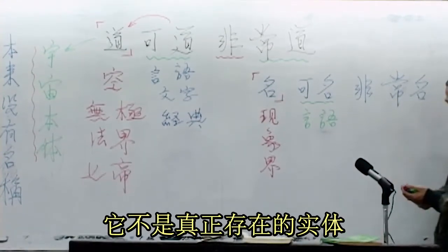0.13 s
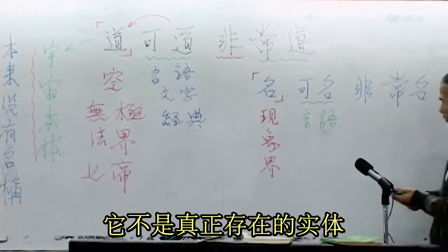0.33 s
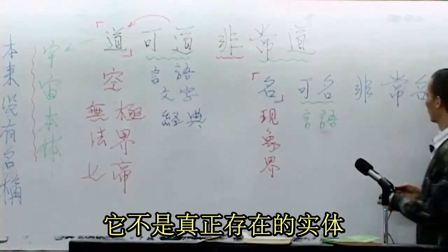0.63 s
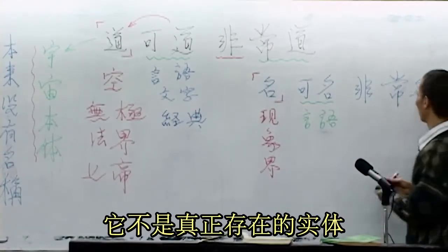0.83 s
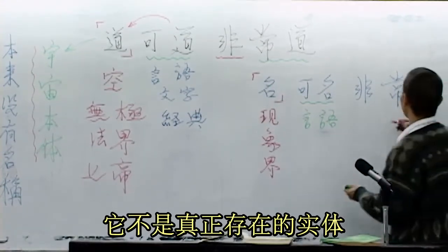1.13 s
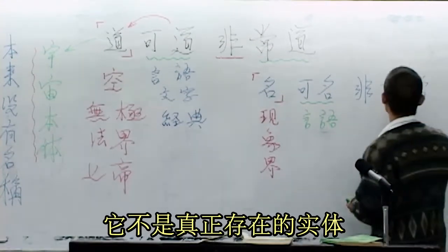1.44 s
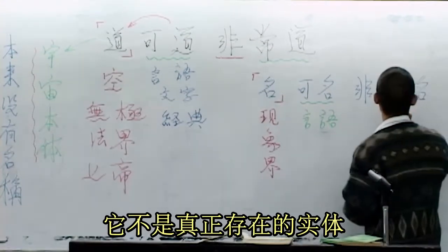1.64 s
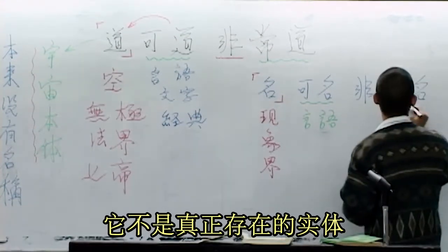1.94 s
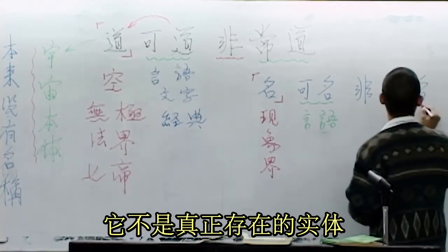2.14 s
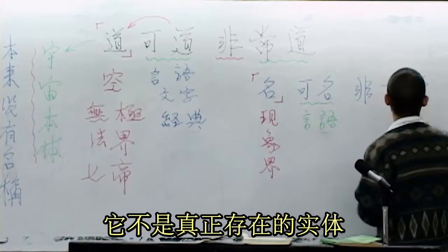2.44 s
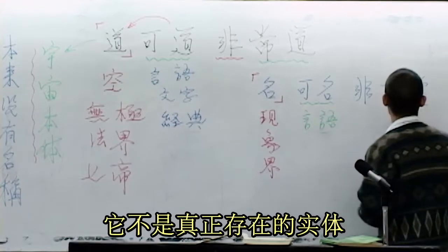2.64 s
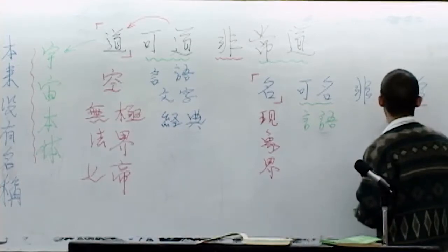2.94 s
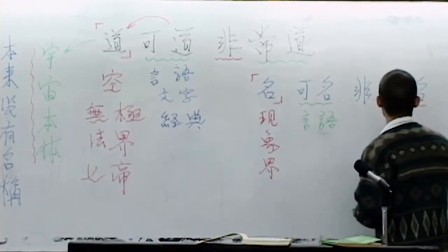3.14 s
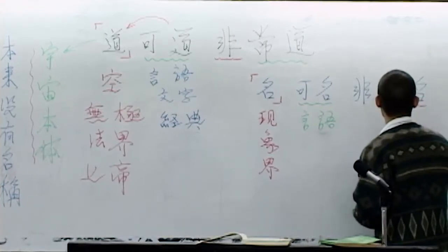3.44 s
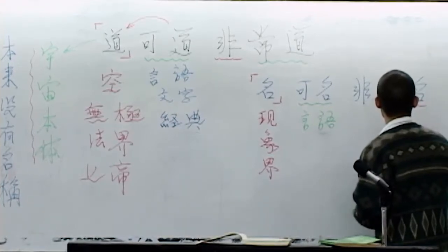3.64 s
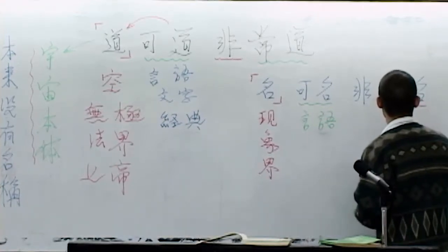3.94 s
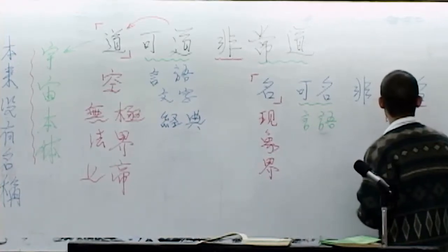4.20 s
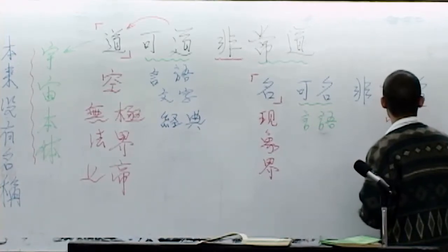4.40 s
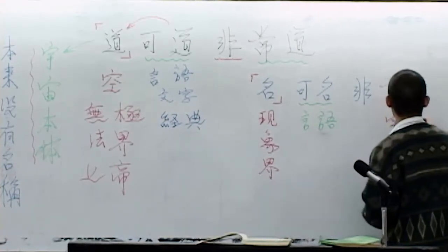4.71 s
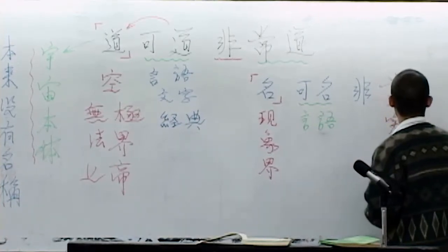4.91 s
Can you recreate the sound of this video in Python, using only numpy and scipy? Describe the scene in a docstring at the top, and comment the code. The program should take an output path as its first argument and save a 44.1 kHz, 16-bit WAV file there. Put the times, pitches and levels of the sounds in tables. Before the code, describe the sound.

Small plastic clicks and a cap snap, followed by faint squeaky marker strokes and soft thuds on a whiteboard over low room rumble.

```python
"""A felt-tip marker on a classroom whiteboard, close to the microphone. The teacher clicks the plastic cap,
snaps it off and steps up; something hollow is knocked. The tip rubs in fine grains, sticks and slips
in squeaks, and lands with dull thuds of the panel. The room rings faintly behind it, over a low rumble,
bumps through the floor and a thin high whine. The recorder's noise suppressor trims the tails."""
import sys
import numpy as np
from scipy import signal
from scipy.fft import rfft, irfft, next_fast_len
from scipy.io import wavfile
from scipy.ndimage import uniform_filter1d, map_coordinates

SR = 44100
rng = np.random.default_rng(int(sys.argv[2]) if len(sys.argv) > 2 else 0)


def wav_record(signal):
    """Record a signal, one row per channel, as 16-bit PCM in the file named by sys.argv[1]."""
    frames = np.transpose(np.atleast_2d(signal))
    bounded = np.clip(frames, -1, 1)
    # unit amplitude maps onto the largest positive 16-bit level
    quanta = np.round(bounded * 32767).astype(np.int16)
    wavfile.write(sys.argv[1], SR, quanta)


N = 223317
TIME = np.arange(N) / SR

# spectrum of the noise behind the room's rumble: f/Hz, level/dB
RUMBLE_SPECTRUM = [(20, -24.5), (35, -7.5), (50, 4.5), (72, -5), (100, -8.5), (135, -22), (200, -44.5),
                   (400, -73.5)]
# the thin whine, loudest at the start: t/s, level/dB
WHINE_LEVELS = [(0, -75.5), (1.1, -79.5), (1.85, -89), (2.85, -89.5), (3.1, -106), (5.06, -95.5)]
# the pen clicking in the hand: t/s, level/dB, contact time/s, treble tilt/(dB per octave)
PEN_CLICKS = [(.0074, -36, 0.0001, 4), (.0575, -59, 0.00028, -0.5), (.0821, -40.5, 0.00023, -0.5),
              (.0985, -62, 0.00037, -2), (.1145, -48, .003, 1), (.1187, -41, 0.0016, -3),
              (.3193, -33.5, 0.00075, -13.5), (.3612, -46.5, 0.00064, -14.5), (.3795, -68, 0.00039, -4.5)]
# the ring of the pen's barrel: f/Hz, level/dB
BARREL_SPECTRUM = [(1900, -74), (2450, -47.5), (2750, -25.5), (3100, -43.5), (3550, -21), (3950, -42.5),
                   (4280, -28), (4480, -36), (4800, -18.5), (5400, -9), (6200, -21.5), (6850, -17),
                   (7700, -30.5), (9300, -40.5), (10000, -32.5), (11500, -47), (12700, -36.5),
                   (14500, -61.5)]
# small parts that ping at one tone: t/s, f/Hz, level/dB, t60/s
PART_PINGS = [(.118, 1108, -72, 0.076), (3.537, 590, -55.5, 0.014), (3.539, 2860, -46, 0.024),
              (3.54, 8130, -49.5, 0.016), (4.744, 1280, -78.5, 0.089)]
# bumps through the floor as the teacher shifts: t/s, length/s, level/dB
FLOOR_BUMPS = [(0.238, 0.034, -52.5), (0.403, 0.22, -61.5), (.68, 0.17, -54), (0.846, 0.16, -58),
               (1.052, .11, -53.5), (1.302, 0.18, -58), (1.439, .12, -55.5), (1.598, 0.18, -56),
               (1.724, .17, -51.5), (2.139, 0.063, -52), (2.233, 0.037, -54), (2.398, 0.064, -53.5),
               (2.512, 0.12, -55), (2.758, 0.18, -44.5), (2.92, 0.19, -48), (3.628, 0.16, -50.5),
               (3.908, 0.2, -63), (4.141, .12, -56), (4.512, 0.065, -57.5), (4.676, 0.24, -55.5),
               (4.852, 0.34, -46.5)]
# the cap riding over its ridge: t/s, level/dB, contact time/s, treble tilt/(dB per octave)
CAP_SNAPS = [(.9850, -55, 0.0026, 2.5), (.9890, -55.5, .0008, 2), (.9908, -33.5, 0.00049, -0.5),
             (.9946, -37, 0.00027, 1), (1.0064, -44, 0.00069, 1)]
# the ring of the cap: f/Hz, level/dB
CAP_SPECTRUM = [(690, -56), (830, -19.5), (1200, -49), (1500, -27.5), (1680, -8.5), (1880, -21.5),
                (2130, -9), (2450, -27), (3400, -5.5), (4150, -14.5), (4750, -2), (5900, -17.5),
                (7900, -7.5), (9300, -32), (10400, -14), (12400, -57)]
# one step up to the board: t/s, level/dB, tilt/(dB per octave)
FOOTSTEPS = [(1.161, -30, 1.5)]
# the floor's low modes: f/Hz, level/dB, swell time/s
FLOOR_MODES = [(49.7, -22, 0.038), (87.6, 0.5, 0.018), (124, -5.5, 0.017), (163, -6.5, 0.012),
               (212, -24, 0.026)]
# the contacts of one chattering knock: t/s, level/dB
KNOCK_CONTACTS = [(1.745, -53.5), (1.755, -44), (1.768, -53.5), (1.782, -52)]
# the hollow body's modes: f/Hz, level/dB, t60/s
HOLLOW_MODES = [(146, 2, 0.18), (244.2, 6, 0.23), (365.6, 0, 0.16), (611, -14.5, 0.35), (688, -9.5, 0.12),
                (863, -9, 0.083), (987.5, -1.5, 0.1), (1456, -17.5, 0.059), (1857, -23, 0.077),
                (3040, -30, 0.079)]
# strokes of the felt tip, whose angle sets two resonances:
# t/s, length/s, nib level/dB, rasp level/dB, swell over the stroke/dB, nib f/Hz, rasp f/Hz
TIP_STROKES = [(1.908, 0.053, -100, -77, 4.5, 4560, 6530), (1.958, 0.25, -91, -68.5, -9, 4550, 6610),
               (2.129, 0.09, -74, -65.5, -0.5, 4590, 6690), (2.237, 0.089, -74, -64.5, 14.5, 4750, 6705),
               (2.358, 0.18, -87.5, -84, -10.5, 4765, 6600), (2.839, 0.046, -87.5, -108, 2.5, 5230, 6020),
               (3.009, 0.084, -75, -86, -6, 5105, 5840), (3.116, 0.061, -84.5, -108, 5.5, 5180, 5700),
               (3.177, 0.062, -70, -86, 8.5, 5320, 6130), (3.237, 0.087, -78.5, -71.5, -2, 5440, 6100),
               (3.321, 0.13, -71.5, -84, -23.5, 5040, 6000), (3.518, 0.031, -63, -67.5, 1.5, 4860, 6720),
               (3.594, 0.039, -62.5, -80.5, 7, 4950, 6830), (3.675, 0.045, -63, -79.5, 3, 5270, 6800),
               (3.743, 0.038, -65.5, -85.5, -7, 5100, 6340), (3.786, 0.023, -57, -74, 3, 5040, 7210),
               (3.849, 0.071, -62, -72.5, 0, 5276, 6910), (3.95, 0.25, -84.5, -98.5, -6.5, 5270, 6670),
               (4.114, 0.093, -59.5, -66, 9.5, 5020, 6950), (4.235, .13, -77, -78.5, -5.5, 4870, 6860),
               (4.364, 0.094, -76.5, -75, 3, 4780, 6390), (4.475, 0.064, -85, -86.5, -7, 4600, 6670),
               (4.571, 0.024, -70, -84, -1, 4805, 6800), (4.938, 0.15, -72.5, -80, -14.5, 5090, 6700)]
# narrow resonances of the pen that colour every stroke: f/Hz, half-width/Hz, boost/dB
PEN_RESONANCES = [(4590, 41, 7.5), (5240, 70, 6), (6480, 60, 3.5), (6823, 59, 6.5)]
# gliding squeaks of the tip: t/s, length/s, level/dB, first f/Hz, last f/Hz
TIP_SQUEAKS = [(2.116, 0.087, -75.5, 4670, 4670), (2.316, 0.033, -58.5, 4840, 4705),
               (3.333, 0.033, -58.5, 4763, 4620), (3.5396, 0.0065, -32, 4290, 5940),
               (3.641, .01, -62.5, 4790, 4410), (3.6503, 0.0046, -48.5, 5530, 5260),
               (4.171, .007, -49, 4740, 4780), (4.186, .009, -43.5, 4710, 4680),
               (4.2, 0.0096, -48, 4770, 4570), (4.2057, .02, -36.5, 4670, 4470),
               (4.99, 0.042, -62.5, 4837, 4774)]
# the tip landing on the panel: t/s, level/dB, tilt/(dB per octave)
TIP_LANDINGS = [(2.790, -35.5, 1.5), (3.003, -35.5, 0.5), (3.526, -40, 2), (4.058, -44.5, -6),
                (4.34, -47.5, -2.5), (4.902, -49.5, -5.5)]
# the panel's low modes: f/Hz, level/dB, swell time/s
PANEL_MODES = [(47.7, -13, 0.031), (77.8, -0.5, 0.019), (154, -3.5, 0.012), (200, -7, 0.016),
               (242, 1, 0.011), (303, -13, 0.009)]
# the classroom's reverberation: f/Hz, t60/s
ROOM_DECAY = [(80, 0.99), (250, 1), (1000, 0.11), (2200, 0.83), (3500, 1), (5400, 0.94), (7500, 1),
              (11000, 0.91), (14000, .45)]
# the suppressor shuts bands that fall below this: f/Hz, power density/dB
SUPPRESSOR_THRESHOLD = [(30, -91), (80, -87.5), (250, -92.5), (500, -108), (1500, -116), (3000, -117),
                        (5500, -118), (8500, -118), (12000, -124)]
# the recorder's own hiss: f/Hz, relative level/dB
HISS_SPECTRUM = [(30, -3), (200, 4.5), (500, 2), (1200, -6), (3000, -12.5), (8000, -16), (15000, -21)]


def amp(db):
    """Decibels to gain."""
    return 10 ** (np.asarray(db) / 20)


def unit(x):
    """Scale to rms 1."""
    return x / np.sqrt(np.mean(x ** 2) + 1e-20)


def along(points, hz):
    """Read (f/Hz, value) points on a log frequency axis."""
    f, values = np.transpose(points)
    return np.interp(np.log(hz + 1), np.log(f + 1), values)


def wobble(rate):
    """A smooth random curve, rate knots a second."""
    return map_coordinates(rng.standard_normal(int(N * rate / SR) + 4), [TIME * rate])


def filtered(x, response):
    """x through a gain given as a function of frequency."""
    size = next_fast_len(N + SR // 2)
    return irfft(rfft(x, size) * response(np.fft.rfftfreq(size, 1 / SR)), size)[:N]


def noise(spectrum):
    """Noise with a (f/Hz, level/dB) spectrum, at rms 1."""
    return unit(filtered(rng.standard_normal(N), lambda hz: amp(along(spectrum, hz))))


def band(x, centre_hz, width_hz, steepness=1.59):
    """x through one steep-sided resonance, at rms 1."""
    return unit(filtered(x, lambda hz: np.exp(-.5 * np.abs((hz - centre_hz) / width_hz) ** steepness)))


def ring(gain_db, size=4096):
    """Causal impulse response of a body, from its gain in dB as a function of frequency."""
    cepstrum = irfft(np.log(amp(gain_db(np.fft.rfftfreq(size, 1 / SR)))))
    cepstrum[1:size // 2] *= 2
    cepstrum[size // 2 + 1:] = 0
    return irfft(np.exp(rfft(cepstrum)))


def add(track, s, sound):
    """Mix a sound in at time s."""
    start = max(round(s * SR), 0)
    track[start:start + len(sound)] += sound[:N - start]


def rumble(level_db=-70, throb_db=6.5, top_hz=118):
    """Room tone: a throbbing low rumble that swells for a few cycles with each bump through the floor."""
    low = noise(RUMBLE_SPECTRUM)
    low = low / np.abs(signal.hilbert(low))  # a flat envelope keeps the throbs even
    low = unit(filtered(low, lambda hz: 1 / (1 + (hz / top_hz) ** 6)))
    throb = amp(level_db + throb_db * wobble(11))
    bumps = np.zeros(N)
    for s, length, db in FLOOR_BUMPS:
        bumps += amp(db) * np.sin(np.pi * np.clip((TIME - s) / length, 0, 1))
    return np.hypot(throb, bumps) * low


def whine(centre_hz=8630, flicker_db=2.0):
    """A thin, frayed tone in the background that wavers in pitch and flickers in level."""
    hz = centre_hz + 60 * wobble(14) + 55 * wobble(260)
    fray = unit(1 + .55 * wobble(170) + .55 * wobble(60))
    level_db = np.interp(TIME, *np.transpose(WHINE_LEVELS)) + flicker_db * wobble(15)
    return amp(level_db) * fray * np.sin(2 * np.pi * np.cumsum(hz) / SR)


def plastic_clicks(contacts, body, main_hz):
    """Each contact is a short rough slip that rings barrel or cap; long slips favour the main mode."""
    out, t = np.zeros(N), TIME[:1024]
    for s, db, contact, tilt_db in contacts:
        friction = np.cos(2 * np.pi * main_hz * t) + rng.standard_normal(len(t))
        slip = friction * np.exp(-(t / contact) ** 2) * t / contact
        slip[0] += 0.00068 / contact  # a short contact is more of a blow than a slip
        response = ring(lambda hz: along(body, hz) + tilt_db * np.log2(np.maximum(hz / main_hz, 1)))
        click = signal.fftconvolve(slip, response)
        add(out, s, amp(db) * click / np.std(click[:256]))
    return out


def pings(attack_s=0.0019):
    """Small parts each ring at one damped tone with a soft start."""
    out, t = np.zeros(N), TIME[:SR // 4]
    onset = 1 - np.exp(-(t / attack_s) ** 2)
    for s, hz, db, t60 in PART_PINGS:
        add(out, s, amp(db - 60 * t / t60) * onset * np.sin(2 * np.pi * hz * t))
    return out


def thuds(blows, modes, pivot_hz=120, top_hz=335, detune=0.031):
    """A push on floor or panel makes its low modes swell and die; a firmer one favours the upper modes."""
    out, t = np.zeros(N), TIME[:SR // 3]
    for s, db, tilt_db in blows:
        for hz, mode_db, swell in modes:
            envelope = (t / swell * np.exp(1 - t / swell)) ** 2
            gain = amp(db + mode_db + tilt_db * np.log2(hz / pivot_hz))
            detuned_hz = hz * (1 + detune * rng.standard_normal())
            add(out, s, gain * envelope * np.sin(2 * np.pi * detuned_hz * t))
    return filtered(out, lambda hz: 1 / np.sqrt(1 + (hz / top_hz) ** 20))


def hollow_knock(attack_s=0.0087, spread_db=1.5):
    """Every contact rings the hollow body's modes at new strengths."""
    out, t = np.zeros(N), TIME[:SR // 2]
    onset = 1 - np.exp(-t / attack_s)
    for s, db in KNOCK_CONTACTS:
        for hz, mode_db, t60 in HOLLOW_MODES:
            decay = amp(db + mode_db + rng.normal(0, spread_db) - 60 * t / t60)
            add(out, s, onset * decay * np.sin(2 * np.pi * hz * t))
    return out


def felt_grains(patch_db=5, grain_db=0.5, judder_db=0.5):
    """Fibres catch and let go: noise with narrow peaks that come and go, coloured by the pen."""
    spectra = signal.stft(rng.standard_normal(N), nperseg=512)[2]
    patches = uniform_filter1d(rng.standard_normal(spectra.shape), size=2, axis=0)
    patches = unit(uniform_filter1d(patches, size=12, axis=1))  # each lasts some tens of milliseconds
    grains = signal.istft(spectra * amp(patch_db * patches), nperseg=512)[1][:N]
    grains *= amp(grain_db * wobble(600) + judder_db * wobble(90))
    return filtered(grains, lambda hz: amp(sum(db / (1 + ((hz - f) / width) ** 2)
                                               for f, width, db in PEN_RESONANCES)))


def pressure(s, length, swell_db, attack_s=0.015, lift_db_per_s=480.5):
    """One stroke's envelope: the tip sets in, presses harder or eases off, and lifts."""
    t = TIME - s
    held_db = swell_db * (np.clip(t / length, 0, 1) - .5)
    lifted_db = lift_db_per_s * np.maximum(t - length, 0)
    return np.clip(t / attack_s, 0, 1) * amp(held_db - lifted_db)


def rubbing(nib_trim_db=-.5, rasp_trim_db=-2.0):
    """The felt's grains ring the tip's two resonances, stroke by stroke."""
    out, grains = np.zeros(N), felt_grains()
    for s, length, nib_db, rasp_db, swell_db, nib_hz, rasp_hz in TIP_STROKES:
        nib_width_hz = 285 * (nib_hz / 5092) ** 5.3  # narrower the lower it sits
        nib = amp(nib_db + nib_trim_db) * band(grains, nib_hz, nib_width_hz)
        rasp = amp(rasp_db + rasp_trim_db) * band(grains, rasp_hz, width_hz=427)
        out += pressure(s, length, swell_db) * (nib + rasp)
    return out


def squeaks(jitter=0.0031, shimmer_db=1, rasp_db=-19):
    """Stick-slip locks onto the nib's resonance: an unsteady gliding whistle with a little rasp above."""
    out = np.zeros(N)
    rasp = amp(rasp_db) * band(rng.standard_normal(N), centre_hz=6995, width_hz=100)
    waver = 1 + jitter * wobble(500)
    shimmer = shimmer_db * wobble(220)
    for s, length, db, first_hz, last_hz in TIP_SQUEAKS:
        span = (TIME >= s) & (TIME < s + length)
        hz = np.linspace(first_hz, last_hz, span.sum()) * waver[span]
        tone = np.sqrt(2) * np.sin(2 * np.pi * np.cumsum(hz) / SR)
        envelope = signal.windows.tukey(len(hz), alpha=.6) * amp(db + shimmer[span])
        out[span] += envelope * (tone + rasp[span])
    # the small tip radiates only treble
    return filtered(out, lambda hz: 1 / (1 + ((hz - 6250) / 2150) ** 20))


def in_room(x, near_db, far_db, near_t60):
    """At the microphone: direct sound, near scatter off board and body, and the classroom's far tail."""
    hz, frame_s, spectra = signal.stft(rng.standard_normal(SR), SR, nperseg=256)
    decay = amp(-60 * frame_s / along(ROOM_DECAY, hz)[:, None])
    t = TIME[:SR]
    tail = signal.istft(spectra * decay, SR, nperseg=256)[1][:SR]
    tail *= 1 - np.exp(-t / 0.0046)  # the echoes take a moment to build
    near = rng.standard_normal(SR) * amp(-60 * t / near_t60) * (t > .002)
    response = amp(near_db) * near / np.linalg.norm(near) + amp(far_db) * tail / np.linalg.norm(tail)
    return x + signal.fftconvolve(x, response)[:N]


def noise_suppressor(x, size=2048, steepness=3):
    """Weak bands are shut, so tails end early and faint rubbing thins to lines."""
    frames = dict(fs=SR, nperseg=size, noverlap=size - size // 4, scaling="psd")
    hz, _, spectra = signal.stft(x, **frames)
    power = np.abs(uniform_filter1d(2 * np.abs(spectra) ** 2, size=3, axis=1))
    threshold = amp(along(SUPPRESSOR_THRESHOLD, hz))[:, None] ** 2
    excess = (power / threshold) ** steepness
    return signal.istft(spectra * excess / (1 + excess), **frames)[1][:N]


def scene():
    """The classroom from one microphone close to the whiteboard."""
    pen = plastic_clicks(PEN_CLICKS, BARREL_SPECTRUM, main_hz=5590)
    mix = in_room(pen, near_db=-14.0, far_db=-19.5, near_t60=0.16)
    cap = plastic_clicks(CAP_SNAPS, CAP_SPECTRUM, main_hz=3692)
    mix += in_room(cap, near_db=-8.5, far_db=-23, near_t60=0.27)
    mix += in_room(thuds(FOOTSTEPS, FLOOR_MODES), near_db=-4, far_db=-15.5, near_t60=0.24)
    mix += in_room(thuds(TIP_LANDINGS, PANEL_MODES), near_db=-8, far_db=-19, near_t60=0.45)
    mix += in_room(hollow_knock(), near_db=-4.5, far_db=-21.5, near_t60=0.2)
    mix += in_room(pings(), near_db=2.5, far_db=-32.5, near_t60=0.33)
    mix += in_room(rubbing() + squeaks(), near_db=-12.5, far_db=-26.5, near_t60=0.12)
    return (mix + rumble() + whine())[None]


def record(dry, hiss_db=-94, top_hz=15700):
    """The mono recorder: its noise suppressor, its own faint hiss and its band limit."""
    track = noise_suppressor(dry[0]) + amp(hiss_db) * noise(HISS_SPECTRUM)
    return filtered(track, lambda hz: hz < top_hz)[None]


dry = scene()
out = record(dry)
wav_record(out)
```